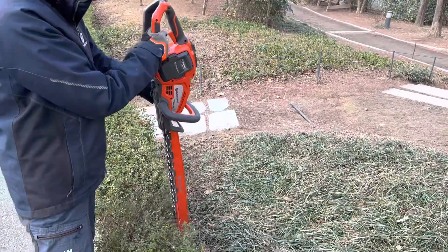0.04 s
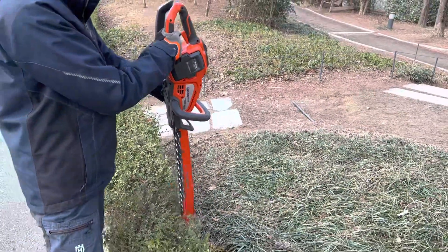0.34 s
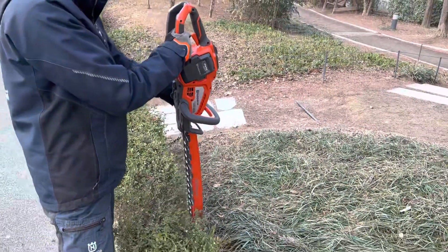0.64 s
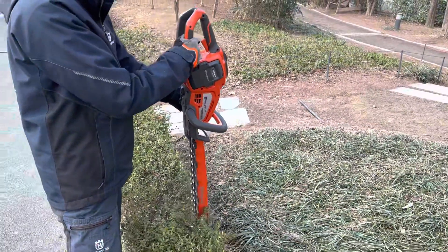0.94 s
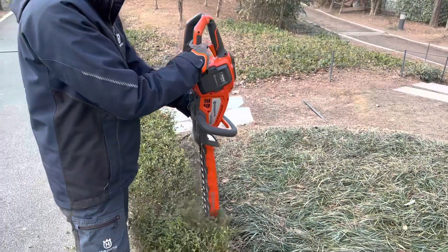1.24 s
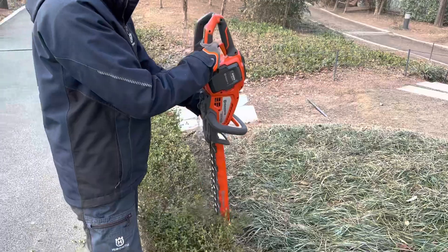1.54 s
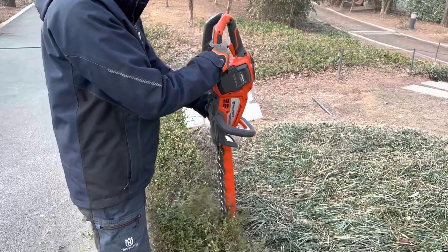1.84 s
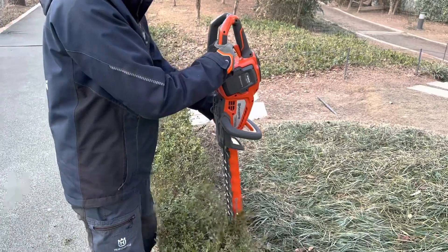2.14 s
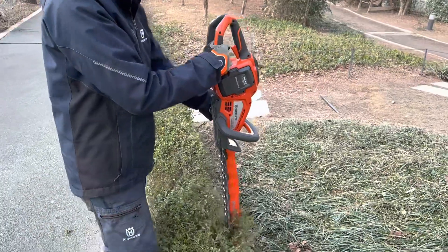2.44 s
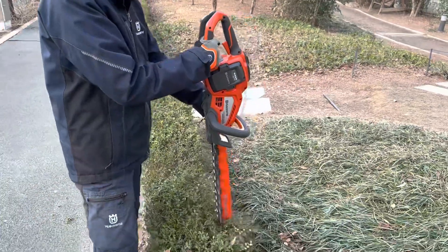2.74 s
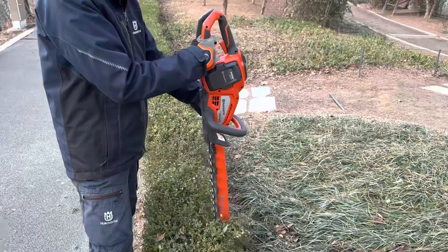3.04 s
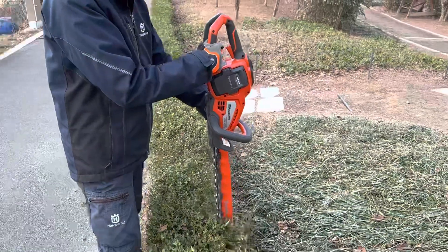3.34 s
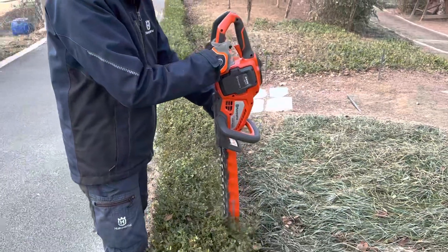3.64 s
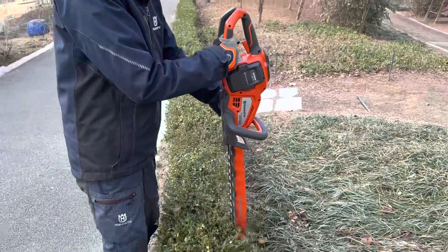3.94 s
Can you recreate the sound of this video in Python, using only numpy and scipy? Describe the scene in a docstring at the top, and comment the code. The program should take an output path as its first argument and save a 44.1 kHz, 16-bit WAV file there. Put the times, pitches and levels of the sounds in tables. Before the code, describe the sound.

Close to the microphone, a battery hedge trimmer whines and clatters without a break as it sweeps along a low hedge. Its pitch rises slightly at first, then stays level, with occasional small twig snaps and a faint wind rumble.

```python
"""At a low hedge, close by, a battery trimmer runs up the last of its speed and sweeps along.
One crank times the machine: its gear whine pulses with the two strokes of every turn, and the
blades knock by impact as they reverse and hiss by friction as they slide. The motor sings above
its cooling fan, the housing buzzes, twigs snap in the teeth, and air rumbles on the microphone."""
import sys
import numpy as np
from scipy import signal
from scipy.fft import rfft, irfft
from scipy.io import wavfile

SR = 44100
rng = np.random.default_rng(int(sys.argv[2]) if len(sys.argv) > 2 else 0)


def output_pcm(signal):
    """Save a mono or channel-first signal as 16-bit PCM at the path in sys.argv[1].

    Samples are clipped to [-1, 1] before scaling.
    """
    pcm = np.clip(np.atleast_2d(signal).T, -1, 1) * 32767
    wavfile.write(sys.argv[1], SR, np.round(pcm).astype(np.int16))


N = 176400
T, HZ = np.arange(N) / SR, np.fft.rfftfreq(N, 1 / SR)
GEAR_TEETH, MOTOR_RATIO, WHINE_ORDER = 55, 9, 26

# Crank speed. Each row: time in seconds, turns per second.
CRANK_SPEED = [(0.0, 21.456), (0.2, 22.194), (0.45, 22.733), (0.9, 23.094), (1.05, 22.96), (1.15, 23.146),
               (1.35, 22.979), (1.6, 23.237), (1.8, 23.163), (2.25, 23.142), (2.55, 23.062), (2.8, 23.085),
               (3.05, 23.098), (3.4, 23.094), (3.7, 23.128), (4.0, 23.147)]
# Gear load. Each row: time in seconds, lag in turns, strain from 0 to 1, first-stroke weight in dB.
GEAR_LOAD = [(0, -0.083, .65, 5), (.5, -.06, 0.2, 1.5), (1.1, -0.02, 0.66, 1), (1.8, 0.034, 1, .5),
             (2.6, 0.02, 1, 0.5), (3.3, 0.0047, 1, -3), (4, 0.037, 1, 2.5)]
# The motor whine starts a little sharp. Each row: time in seconds, added frequency in Hz.
WHINE_SHARPENING = [(0, 130), (.3, 60), (.8, 25), (1.4, 0), (4, 0)]
# Hum of shaft and drive. Each row: multiple of the crank speed, level in dB.
HUM_PARTIALS = [(9, -50.5), (18, -47.5), (24, -47), (25, -49.5), (26, -50.5), (37, -46), (45, -47),
                (46, -44), (49, -41)]
# Blade impacts. Each row: crank angle, rise and fall in turns, centre and width in Hz, level in dB.
BLADE_KNOCKS = [(0.13, 0.04, 0.026, 630, 240, -33), (0.245, 0.028, 0.049, 490, 320, -34),
                (.17, 0.051, 0.035, 845, 374, -24.5), (0.12, .02, 0.11, 1640, 510, -32.5),
                (0.092, 0.015, 0.046, 3050, 3600, -31.5), (0.445, 0.1, 0.025, 1100, 1200, -38),
                (0.586, 0.019, 0.041, 596, 250, -32), (0.712, 0.061, 0.063, 478, 91, -35),
                (0.698, .05, 0.037, 837, 395, -26), (0.608, 0.033, 0.16, 1770, 360, -31.5),
                (0.583, 0.018, 0.026, 3600, 7600, -33.5), (0.65, 0.042, 0.073, 3280, 800, -32)]
# Twigs being cut. Each row: start in seconds, level in dB.
TWIG_SNAPS = [(0.127, -26), (1.031, -21), (1.346, -27), (1.424, -22), (1.444, -23), (1.467, -28),
              (1.619, -21.5), (2.895, -26), (3.77, -35), (3.963, -25.5)]

# Swells within one turn. Each row: crank angle, rise and fall in turns, relative level in dB.
LOAD_SWELLS = [(.385, .1, .083, -4), (.925, .145, .064, 0)]
FRICTION_SWELLS = [(0.37, 0.092, .06, -4), (0.694, 0.014, 0.046, -3.5), (0.83, .13, 0.042, -7.5),
                   (0.076, 0.025, 0.031, -9)]
RATTLE_SWELLS = [(.13, 0.053, 0.088, -2.3), (.68, .06, 0.13, -0.61)]

# Resonances. Each row: centre in Hz, bandwidth in Hz, relative level in dB.
BAR_MODES = [(3100, 400, -40.5), (5040, 450, -44), (6280, 360, -38.5), (8130, 400, -53.5), (9920, 360, -48),
             (13920, 260, -43)]
SHELL_MODES = [(1714, 200, -34), (2270, 180, -44), (3560, 490, -41.5)]

# Noise spectra. Each row: frequency in Hz, relative spectral density in dB.
CLATTER_SPECTRUM = [(90, -7), (170, -6), (330, -5), (430, -5.5), (700, -1), (1100, 3.5), (1250, 11.5),
                    (1400, 7), (1600, -5), (2000, -1.5), (2650, -9.5), (3100, -4), (3550, -5.5),
                    (3950, -14), (5000, -13), (6000, -14), (7500, -17.5), (10000, -31.5), (16000, -30)]  # housing and fan together
FRICTION_SPECTRUM = [(3000, -5.5), (5000, -3.5), (5900, 0.5), (6400, 1.5), (6900, 3), (7600, -5.5),
                     (8200, 1.5), (8850, 2.5), (9300, -8), (10000, -5), (10700, -12.5), (12300, -9),
                     (13200, 0.5), (13900, -8), (14250, 0.5), (15700, -2)]
FRACTURE_SPECTRUM = [(200, -3), (700, -3.5), (2800, 3.5), (5000, -8), (9000, -8.5), (16000, -21)]
WIND_SPECTRUM = [(8, -60), (22, -40), (31, -21), (40, -10.5), (56, 3), (75, -2.5), (110, -11.5), (200, -27),
                 (500, -45)]

# Slow envelopes. Each row: time in seconds, gain in dB.
MESH_FUNDAMENTAL_GAIN = [(0.0, -24.5), (0.28, -20.5), (0.63, -20.5), (1.14, -20.5), (1.8, -23.5),
                         (3.58, -17.5), (3.75, -21.5), (3.79, -18.5), (3.8, -20.5), (3.98, -21),
                         (4.0, -17.5)]
MESH_SECOND_GAIN = [(0, -38.5), (.25, -32.5), (.5, -30.5), (.8, -35), (1.3, -40), (1.7, -43), (2.1, -43),
                    (2.6, -50), (4, -45)]
MESH_THIRD_GAIN = [(0, -42), (.2, -40), (.45, -54), (1, -60), (4, -48)]
KNOCK_GAIN = [(0, -0.5), (1.4, 1), (2.2, 0), (2.8, -0.5), (3.3, 1.5), (4, -2.5)]
CLATTER_GAIN = [(0, -26.5), (1.2, -25), (1.45, -26), (1.7, -25.5), (2.5, -26.5), (4, -27)]
HISS_GAIN = [(0, -33.5), (.7, -33.5), (1.4, -33), (2.2, -32.5), (3, -31.5), (3.6, -32), (4, -32)]
BAR_GAIN = [(0, -12), (.35, -2), (.7, -1), (1.4, 0.5), (2.2, 0), (2.6, -3), (3.3, -6), (4, -25)]
WHINE_GAIN = [(0, -40), (.6, -38), (1.2, -35.5), (1.8, -36), (2.5, -34.5), (3.1, -40), (3.55, -41.5),
              (4, -51)]
BUZZ_GAIN = [(0, -11), (.5, -15), (2.3, -16), (2.9, -4.5), (3.3, -2.5), (4, 0)]
WIND_GAIN = [(0.0, -37), (0.04, -32), (0.2, -43), (0.23, -34), (0.81, -38.5), (0.87, -46), (0.95, -36.5),
             (2.15, -40.5), (2.18, -44), (2.39, -39.5), (3.22, -44), (4.0, -39)]


def gear_mesh(turns, twist_rad=0.71, jitter_rad=0.26):
    """Modulation of the tooth-rate tone: each stroke loads the teeth and twists the drive's phase."""
    lag, strain, weight_db = (curve(np.array(GEAR_LOAD)[:, [0, k]]) for k in (1, 2, 3))
    first, second = (swell(turns - lag, *row) for row in LOAD_SWELLS)
    load = unit((amp(weight_db) * first + second) * amp(0.14 * wander(hz=40.5)))
    twist = twist_rad * strain * np.cos(4 * np.pi * (turns - .31))
    mesh = 2 * np.pi * GEAR_TEETH * turns + twist
    jitter = jitter_rad * wander(hz=35)
    gains = [MESH_FUNDAMENTAL_GAIN, MESH_SECOND_GAIN, MESH_THIRD_GAIN]
    return load * sum(amp(curve(gain)) * unit(np.sin(k * mesh + jitter))
                      for k, gain in enumerate(gains, start=1))


def blade_knocks(turns, scatter_db=1.2):
    """Impact excitation: play in the drive closes at each reversal and rings the housing."""
    blows = np.zeros(N)
    for at, rise, fall, hz, width, db in BLADE_KNOCKS:
        ringing = resonance(chatter(turns), hz, width)
        blows += ringing * swell(turns, at, rise, fall, db) * amp(scatter_db * wander(hz=18))
    return blows * amp(curve(KNOCK_GAIN))


def clatter_and_fan(turns):
    """Broadband noise: the steady clatter of the housing and the rush of the fan share one spectrum."""
    return colour(chatter(turns), CLATTER_SPECTRUM) * amp(curve(CLATTER_GAIN))


def blade_friction(turns, grain_db=1, flicker_db=0.72):
    """Sliding friction: steel on steel gives a grainy, pulsing hiss and excites the bar's modes."""
    rub = 0.7 + sum(swell(turns, *row) for row in FRICTION_SWELLS)
    grains = rng.standard_normal(N) * rub * amp(grain_db * wander(hz=900))
    hiss = colour(grains, FRICTION_SPECTRUM)
    scrape = chatter(turns) * rub
    bar = sum(amp(db) * resonance(scrape, hz, width) for hz, width, db in BAR_MODES)
    return amp(curve(HISS_GAIN) + flicker_db * wander(hz=10)) * hiss + amp(curve(BAR_GAIN)) * bar


def motor(turns, flutter_db=2, waver_rad=0.31, swing_rad=1.8, jitter_rad=0.69):
    """Rotational harmonics: a faint hum, and a high whine frequency-modulated by each stroke."""
    hum = np.zeros(N)
    for order, db in HUM_PARTIALS:
        gain = amp(db + flutter_db * wander(hz=2.8))
        hum += gain * unit(np.sin(2 * np.pi * order * (turns - .67) + waver_rad * wander(hz=6)))
    cycles = WHINE_ORDER * MOTOR_RATIO * turns + np.cumsum(curve(WHINE_SHARPENING)) / SR
    swing = swing_rad * np.sin(4 * np.pi * (turns - 0.346))
    whine = np.sin(2 * np.pi * cycles + swing + jitter_rad * wander(hz=36))
    return hum + amp(curve(WHINE_GAIN)) * unit(whine)


def housing_buzz(turns):
    """Forced vibration: loose shell parts buzz after each reversal, more so late in the sweep."""
    shake = chatter(turns) * (0.47 + sum(swell(turns, *row) for row in RATTLE_SWELLS))
    buzz = sum(amp(db) * resonance(shake, hz, width) for hz, width, db in SHELL_MODES)
    return amp(curve(BUZZ_GAIN)) * buzz


def leaves_and_twigs(leaves_per_s=98, scatter_db=6, leaf_decay_s=0.00083, twig_decay_s=0.0084):
    """Fracture transients: leaves tick and twigs snap as noise bursts that decay exponentially."""
    cuts = rng.random(N) < leaves_per_s / SR
    strength = amp(scatter_db * np.minimum(rng.exponential(1, N), 3))
    ticks = signal.lfilter([1], [1, -np.exp(-1 / (leaf_decay_s * SR))], cuts * strength)
    leaves = amp(-42) * colour(ticks * rng.standard_normal(N), FRACTURE_SPECTRUM)
    snaps = sum(amp(db) * (T >= start) * np.exp(-abs(T - start) / twig_decay_s)
                for start, db in TWIG_SNAPS)
    return leaves + snaps * colour(rng.standard_normal(N), FRACTURE_SPECTRUM)


def wind():
    """Turbulence: moving air makes a low rumble on the microphone."""
    return amp(curve(WIND_GAIN)) * colour(rng.standard_normal(N), WIND_SPECTRUM)


def chatter(turns, repeat_share=.4, harmonics=950):
    """Partly periodic excitation: a share of the noise power recurs with every crank turn."""
    pattern = irfft(np.exp(2j * np.pi * rng.random(harmonics + 1)), harmonics * 16)
    periodic = unit(pattern[(turns % 1 * len(pattern)).astype(int)])
    return np.sqrt(repeat_share) * periodic + np.sqrt(1 - repeat_share) * rng.standard_normal(N)


def swell(turns, at, rise, fall, db):
    """Periodic envelope: an asymmetric Gaussian peaks at one crank angle of every turn."""
    past = (turns - at + .5) % 1 - .5
    return amp(db) * np.exp(-.5 * (past / np.where(past < 0, rise, fall)) ** 2)


def resonance(x, hz, width):
    """Band-pass response of one mode to x, at rms 1."""
    return unit(irfft(rfft(x) / np.sqrt(1 + (2 * abs(HZ - hz) / width) ** 4), N))


def colour(x, spectrum):
    """Spectral shaping of x, at rms 1."""
    hz, db = np.transpose(spectrum)
    gain = amp(np.interp(np.log(HZ + 1), np.log(hz), db))
    return unit(irfft(rfft(x) * gain, N))


def wander(hz):
    """Random fluctuation: low-passed noise at rms 1."""
    return unit(irfft(rfft(rng.standard_normal(N)) / (1 + (HZ / hz) ** 4), N))


def curve(points):
    """Linear interpolation in time."""
    return np.interp(T, *np.transpose(points))


def amp(db):
    """Amplitude ratio from decibels."""
    return 10 ** (np.asarray(db) / 20)


def unit(x):
    """Normalisation to rms 1."""
    return x / np.sqrt(np.mean(x ** 2) + 1e-20)


def scene():
    """Superposition: the machine's parts, all timed by one crank, add to the hedge and the wind."""
    turns = np.cumsum(curve(CRANK_SPEED)) / SR
    trimmer = gear_mesh(turns) + motor(turns) + blade_knocks(turns) + clatter_and_fan(turns)
    trimmer += housing_buzz(turns) + blade_friction(turns)
    return (trimmer + leaves_and_twigs() + wind())[None]


def record(dry):
    """Filtering: a deep notch in the treble, then a steep band limit."""
    notch_hz, half_width_hz, cutoff_hz = 11314, 546, 15720
    notch = 1 / np.sqrt(1 + (half_width_hz / (abs(HZ - notch_hz) + 1)) ** 16)
    notched = irfft(rfft(dry) * notch, N)
    low_pass = signal.firwin(1023, cutoff_hz, window=("kaiser", 9), fs=SR)
    return signal.oaconvolve(notched, low_pass[None], "same")


dry = scene()
out = record(dry)
output_pcm(out)
```